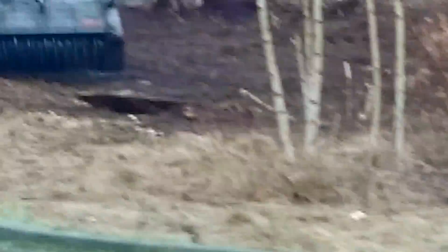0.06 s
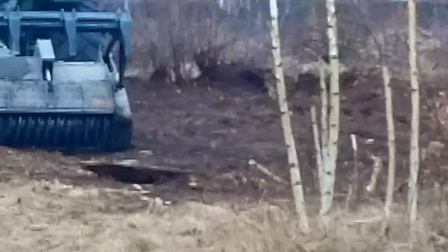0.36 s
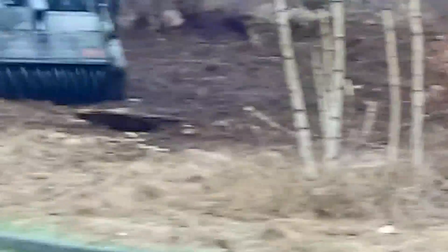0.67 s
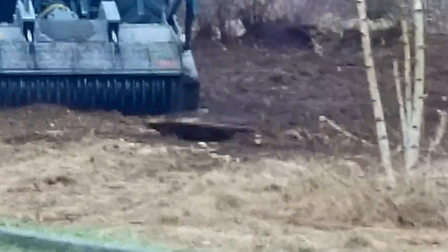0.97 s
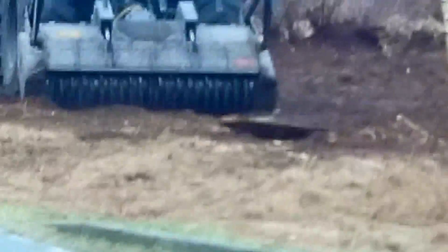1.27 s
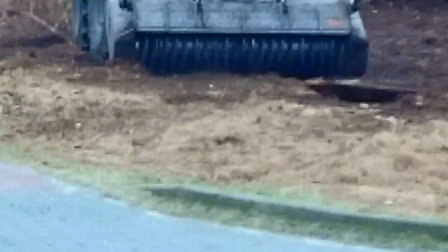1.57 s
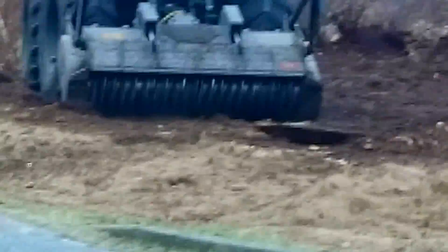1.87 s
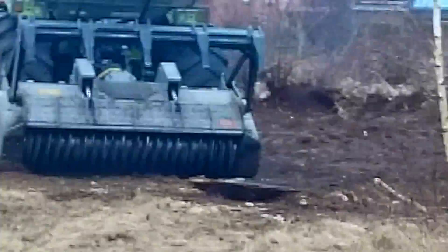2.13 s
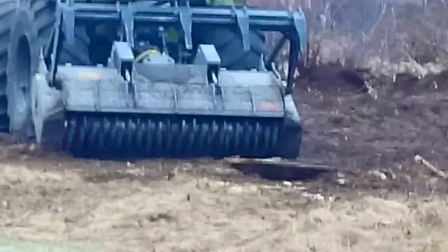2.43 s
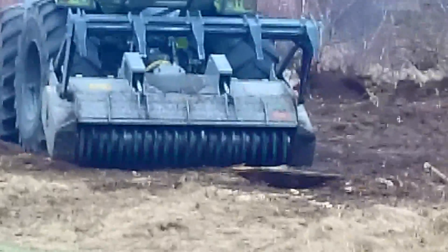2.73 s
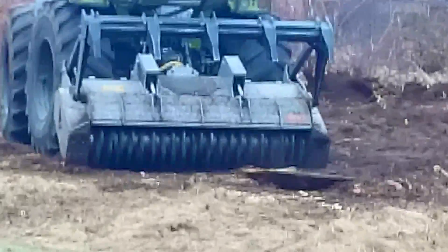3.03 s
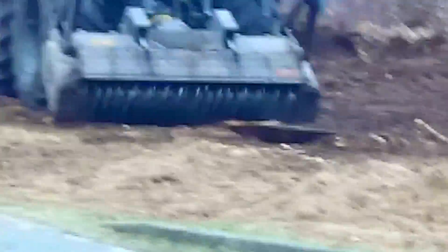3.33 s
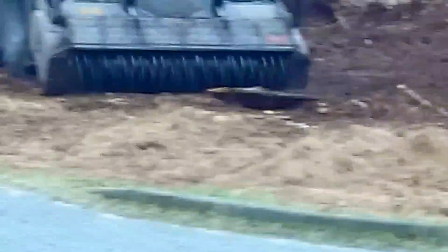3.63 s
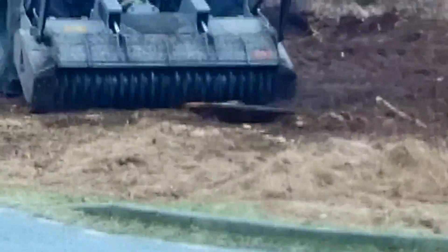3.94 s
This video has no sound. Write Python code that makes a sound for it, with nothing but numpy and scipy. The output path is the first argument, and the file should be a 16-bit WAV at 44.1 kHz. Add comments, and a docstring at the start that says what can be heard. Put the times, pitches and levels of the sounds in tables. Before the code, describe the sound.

Close by outdoors, a handheld phone picks up a throbbing diesel tractor driving a rattling mulcher. Brush crackles and crunches, eases off as the engine grows louder, then crackles again with sharp twig snaps and a faint whine.

```python
"""The throbbing drone of a six-cylinder diesel tractor, working in dry brush with a mulcher on its front.
The exhaust beats against the slightly slower hum of the rotor, over gas rumble, clatter and a thin whine.
Breaking brush crackles in two long surges, single twigs snap, and a green stem squeaks once.
Heard from nearby on a handheld phone, through two closely spaced microphone ports."""
import sys
import numpy as np
from scipy import signal
from scipy.fft import rfft, irfft
from scipy.io import wavfile
from scipy.ndimage import map_coordinates

SR = 44100
rng = np.random.default_rng(int(sys.argv[2]) if len(sys.argv) > 2 else 0)


def unload_wav(signal):
    """Save mono or channel-first audio to the path in sys.argv[1] as 16-bit WAV at rate SR, clipped to [-1, 1]."""
    wavfile.write(
        sys.argv[1],
        SR,
        np.round(np.clip(np.atleast_2d(signal).T, -1, 1) * 32767).astype(np.int16),
    )


N = 176400

# the phone's two ports (frequency [Hz], left minus right [dB], left phase lead [rad])
MIC_PORTS = [(60, -7.1, 0.82), (93, -5.7, 0.68), (186, -3.5, 0.36), (400, -3.7, 0.3), (600, -5.6, 0.28),
             (950, 0.2, 0.21), (1200, -6.0, -0.72), (1350, 0.0, 1.53), (1700, 5.2, 0.74), (2400, 6.5, 0.04),
             (2900, 4.9, -0.06), (3400, 0.7, -0.6), (4200, 0.8, -1.17), (4700, -0.2, -2.87),
             (5400, -6.5, -4.81), (6200, 0.3, -4.62), (7000, 3.5, -5.78), (7900, 4.0, -6.0),
             (8600, 0.2, -6.11), (9500, 5.5, -5.79), (11000, 0.2, -6.34), (12500, 0.9, -6.3),
             (14500, -3.3, -6.3)]

# thin whine from the machine (time [s], level [dB])
WHINE_LEVEL = [(0, -65), (1.1, -42), (1.6, -39.5), (2.1, -44.5), (2.5, -44), (2.68, -40.5), (2.97, -43.5),
               (3.1, -56), (3.21, -38), (3.4, -40), (3.72, -41), (3.89, -52), (4, -38.5)]

# tone of breaking brush (frequency [Hz], relative level [dB])
CRACKLE_SPECTRUM = [(2000, -11), (3100, -11), (4000, -7), (4800, -5.5), (5500, -4), (6400, -6),
                    (7400, -7.5), (8500, -16), (9700, -14), (11200, -22), (12500, -18), (15500, -20)]
# fine crackle and its direction (time [s], level [dB], lead at the left port [microseconds])
CRACKLE_PATH = [(0, -45, 48), (.28, -36.5, 36), (.63, -29, 48), (.8, -30, 35), (1.0, -28, 27),
                (1.2, -30.5, 15), (1.65, -30, -22), (1.87, -38, 13), (2.1, -40.5, 16), (2.45, -44.5, 28),
                (2.72, -49, 12), (2.78, -34.5, -25), (2.95, -42, -5), (3.08, -38.5, -29), (3.33, -38.5, 21),
                (3.68, -33, 24), (3.85, -38, 1.5), (4, -32, 22)]
# thicker stems crunching (time [s], level [dB])
CRUNCH_LEVEL = [(0, -38.5), (.3, -41.5), (.5, -31.5), (.65, -32.5), (.76, -36), (.88, -34), (.915, -28),
                (.955, -40), (.985, -27), (1.03, -36), (1.12, -36), (1.6, -47), (1.9, -58), (3.3, -57),
                (3.65, -37), (4, -50)]
# thin stems splintering (time [s], level [dB])
SPLINTER_LEVEL = [(0, -43.5), (1.1, -36), (1.35, -34.5), (1.6, -32.5), (1.8, -39), (2.1, -62), (2.7, -47),
                  (2.85, -43), (3.1, -38), (3.4, -38.5), (4, -35.5)]
CRUNCH_HZ, SPLINTER_HZ = 4300, 5530
# single twigs (time [s], ring pitch [Hz], crack level [dB], ring level [dB], crunch level [dB])
TWIG_SNAPS = [(0.148, 4540, -36, -27, -25), (0.195, 4400, -43, -33, -27), (0.64, 4900, -45, -24, -34),
              (0.657, 4760, -31, -28, -34), (0.719, 7050, -35, -30, -41), (.978, 4400, -35.5, -26, -20),
              (0.986, 4020, -31, -24, -24), (1.482, 5670, -29, -23, -36), (1.528, 5700, -33, -28, -38),
              (2.128, 5500, -42, -32, -31), (2.173, 5640, -38, -32, -36), (2.417, 5600, -37, -28, -29),
              (2.739, 5200, -24, -26, -36), (2.835, 6670, -33, -31, -42), (2.863, 6950, -36, -36, -40),
              (3.027, 5710, -40, -22.5, -35), (3.036, 5940, -41, -34, -28), (3.062, 5840, -46, -36, -44),
              (3.072, 5750, -42, -24.5, -42), (3.081, 5370, -44, -28, -42), (3.102, 5300, -35, -36, -44),
              (3.116, 5840, -44, -29, -44), (3.126, 5360, -46, -29, -44), (3.136, 6250, -31, -29, -31),
              (3.32, 5960, -45, -27, -38), (3.441, 6000, -34, -24.5, -26), (3.499, 5600, -29, -42, -28),
              (3.583, 5640, -44, -26, -38)]

# clatter of engine, drive and rotor (frequency [Hz], relative level [dB])
CLATTER_SPECTRUM = [(330, -9.5), (400, -5.5), (480, -3.5), (560, -4.5), (680, -1.5), (830, -9), (1000, -5),
                    (1240, -13), (1450, -8.5), (1750, -4.5), (2000, -6), (2400, -3.5), (2580, -11),
                    (2780, -5.5), (3120, -15), (3600, -9), (3980, -15.5), (4400, -9.5), (4900, -13),
                    (5450, -17.5), (6300, -24), (8000, -34), (11000, -51), (15500, -43)]
# resonances of the steel hood (frequency [Hz], width [Hz], level at 0 dB load [dB])
HOOD_MODES = [(5340, 94, -49), (2370, 19, -57), (1980, 42, -49), (1446, 50, -48), (980, 116, -48.5),
              (703, 47, -52.5), (479.6, 13, -47)]

# tones of the mulcher's rotor (multiple of its turning rate)
ROTOR_ORDERS = [2, 4, 6, 22]
# strength of each rotor tone (level [dB])
ROTOR_LEVELS = [-47.5, -31.5, -39, -58]
THROB_HZ, IN_STEP_S = 5.48, .13  # beat of rotor and firings, and a moment when they are in step

# engine speed (time [s], firing rate [Hz])
FIRING_RATE = [(0.0, 92.44), (0.41, 93.16), (1.0, 93.07), (1.1, 91.48), (1.7, 92.1), (1.75, 92.97),
               (2.72, 93.48), (3.73, 93.55), (4.0, 93.7)]
# engine load, as a gain on the drone (time [s], level [dB])
ENGINE_LOAD = [(0, -4.5), (.8, -5), (1.4, -5.5), (1.75, -2), (2.1, -0.5), (3, 1.5), (4, -1)]
# drone an octave above the firings (time [s], level [dB])
OCTAVE_LEVEL = [(0, -30), (.3, -23), (.55, -26), (.8, -26.5), (1.45, -27.5), (1.7, -22), (1.9, -26.5),
                (2.4, -25.5), (2.7, -23.5), (3.5, -24), (4, -21)]
# weaker tones from unequal cylinders (multiple of the four-stroke cycle rate)
CYCLE_ORDERS = [4, 5, 7, 8, 9, 13, 14, 16, 18, 20, 22, 26, 30, 32]
# strength of each of those tones (level at 0 dB load [dB])
CYCLE_LEVELS = [-40, -40, -35.5, -56, -37, -40, -44, -41.5, -42.5, -41.5, -50, -54.5, -47, -52.5]
# gas rumble from the exhaust (frequency [Hz], relative level [dB])
RUMBLE_SPECTRUM = [(20, -17), (29, -23), (42, -23), (62, 2), (110, -1.5), (160, 2), (188, 0.5), (230, 2.5),
                   (275, -6), (330, -19.5), (450, -19), (900, -54.5)]
CYLINDERS = 6


def undb(db):
    """Decibels to gain."""
    return 10 ** (np.asarray(db) / 20)


def unit(x):
    """Scale to rms 1."""
    return x / np.sqrt(np.mean(x ** 2))


def times():
    """Time of every sample in seconds."""
    return np.arange(N) / SR


def bins():
    """Frequency of every spectral bin, at least 1 Hz."""
    return np.maximum(np.fft.rfftfreq(N, 1 / SR), 1)


def curve(table, column=1):
    """One column of a table, joined over time."""
    rows = np.array(table, float)
    return np.interp(times(), rows[:, 0], rows[:, column])


def response(table, column=1):
    """One column of a table, joined over log frequency."""
    rows = np.array(table, float)
    return np.interp(np.log(bins()), np.log(rows[:, 0]), rows[:, column])


def colour(x, db):
    """Causal filter with the given gain in each bin."""
    cepstrum = irfft(np.log(undb(db)), N)
    cepstrum[1:N // 2] *= 2
    cepstrum[N // 2 + 1:] = 0
    return irfft(rfft(x) * np.exp(rfft(cepstrum)), N)


def resonance(hz, width_hz):
    """Complex gain of a single resonance in each bin."""
    return 1 / (1 + 1j * hz / width_hz * (bins() / hz - hz / bins()))


def band(x, hz, width_hz):
    """Two resonances in series give a steep-sided band, scaled to rms 1."""
    return unit(irfft(rfft(x) * resonance(hz, width_hz) * resonance(hz, 2 * width_hz), N))


def wander(rate_hz):
    """Smooth random drift with rms 1."""
    return unit(irfft(rfft(rng.standard_normal(N)) / (1 + (bins() / rate_hz) ** 4), N))


def clicks(per_s, spread_db):
    """Random clicks, mostly small: one stream from ahead and one from each side."""
    size = undb(spread_db * np.minimum(rng.exponential(size=(3, N)), 2 * np.pi))
    return (rng.random((3, N)) < per_s / SR) * rng.choice([-1, 1], (3, N)) * size


def microphone(x, diffuse=0, lead_us=0):
    """Sound from ahead reaches both ports with a phase difference; side streams reach one port each."""
    streams = np.atleast_2d(x)
    ahead = streams[0]
    sides = np.array([[1], [-1]])
    if np.any(lead_us):
        shift = lead_us * 1e-6 * SR / 2
        ahead = np.array([map_coordinates(ahead, [np.arange(N) + side * shift], mode="mirror")
                          for side in (1, -1)])
    heard = rfft(ahead) * np.exp(.5j * sides * response(MIC_PORTS, column=2))
    if diffuse:
        side_share = diffuse / (1 + (600 / bins()) ** 2)
        heard = np.sqrt(1 - side_share) * heard + np.sqrt(side_share) * rfft(streams[1:])
    balance = undb(sides * response(MIC_PORTS) / 2)
    return irfft(heard * balance / np.sqrt(np.mean(balance ** 2, axis=0)), N)


def stem_squeak(at_s=1.625, half_length_s=.014):
    """A green stem bends with a faint stick-slip squeal."""
    swell = np.exp(-((times() - at_s) / half_length_s) ** 2)
    return microphone(undb(-37) * swell * band(rng.standard_normal(N), hz=2680, width_hz=300))


def machine_whine():
    """A narrow, rough whine that surges as the machine comes closer."""
    whine = band(rng.standard_normal((3, N)), hz=3980, width_hz=150)
    return microphone(undb(curve(WHINE_LEVEL)) * whine, diffuse=.03)


def twig_snaps(decay_s=.0045, ring_width_hz=1000):
    """Each twig breaks with a short broad crack, a ring at its own pitch and a crunch."""
    tilt_db = 4 * np.log2(np.maximum(bins(), 500) / SPLINTER_HZ)
    crack = unit(colour(rng.standard_normal((3, N)), response(CRACKLE_SPECTRUM) + tilt_db))
    crunch = band(rng.standard_normal((3, N)), CRUNCH_HZ, width_hz=1600)
    age = times()[:N // 40]
    envelope = 1.282 * np.exp(-age / decay_s)
    out = np.zeros((3, N))
    for start, hz, crack_db, ring_db, crunch_db in TWIG_SNAPS:
        span = slice(int(start * SR), int(start * SR) + len(age))
        twig = signal.iirpeak(hz, hz / ring_width_hz, fs=SR)
        burst = rng.standard_normal((3, len(age))) * envelope
        ringing = signal.lfilter(*twig, signal.lfilter(*twig, burst))
        out[:, span] += undb(ring_db) * unit(ringing) * np.sqrt(np.mean(envelope ** 2))
        out[:, span] += envelope * (undb(crack_db) * crack[:, span] + undb(crunch_db) * crunch[:, span])
    return microphone(out, diffuse=.61)


def breaking_brush():
    """Dry stems break in a dense crackle, sparser when quiet; the wood rings in two broad bands."""
    level_db = curve(CRACKLE_PATH)
    density = undb(.66 * (level_db - level_db.max()))
    shape_db = response(CRACKLE_SPECTRUM) - 10 * np.log10(1 + (1500 / bins()) ** 4)
    crossover = (bins() / 10500) ** 8
    crackle = 0
    for cut in (crossover, 1 / crossover):  # separate clicks below and above the crossover
        breaks = clicks(per_s=5000 * density, spread_db=3.5) / np.sqrt(density)
        crackle += colour(breaks, shape_db - 10 * np.log10(1 + np.minimum(cut, 100)))
    crunch = band(clicks(per_s=3000, spread_db=3), CRUNCH_HZ, width_hz=1250)
    splinter = band(clicks(per_s=2200, spread_db=1), SPLINTER_HZ, width_hz=870)
    brush = unit(crackle) * undb(level_db)
    brush += crunch * undb(curve(CRUNCH_LEVEL)) + splinter * undb(curve(SPLINTER_LEVEL))
    flicker = undb(wander(45))
    return microphone(brush * flicker, diffuse=.33, lead_us=curve(CRACKLE_PATH, column=2))


def panels(x, decay_s=.012, mix=.35):
    """Many short sheet-metal modes add to the sound passing through."""
    tail = rng.standard_normal(N) * np.exp(-np.minimum(times() / decay_s, 50))
    return irfft(rfft(x) * (1 + mix * rfft(tail) / np.sqrt(np.sum(tail ** 2))), N)


def clatter(rotor_angle):
    """Dense knocks, pulsing once per rotor turn, sound through the frame; light taps ring the hood."""
    pulsing = 1 + .078 * np.cos(rotor_angle)
    knocks = clicks(per_s=9000, spread_db=2.5) * pulsing * undb(1.3 * wander(42))
    low_cut_db = -10 * np.log10(1 + (220 / bins()) ** 6)
    frame = undb(-33) * unit(colour(panels(knocks), response(CLATTER_SPECTRUM) + low_cut_db))
    taps = clicks(per_s=8700, spread_db=1.5)
    modes = sum(undb(db) / np.sqrt(np.pi * width / SR) * resonance(hz, width)
                for hz, width, db in HOOD_MODES)
    hood = irfft(rfft(taps) * modes, N) / np.std(taps)
    return microphone(frame + hood * undb(.5 * curve(ENGINE_LOAD)), diffuse=.39)


def rotor_hum(rotor_angle):
    """The rotor's strongest tone lies just under the firing rate, so that the two beat."""
    return microphone(sum(np.sqrt(2) * undb(db + .5 * wander(1.5)) * np.cos(order * rotor_angle)
                          for order, db in zip(ROTOR_ORDERS, ROTOR_LEVELS)))


def unequal_cylinders(cycle_angle):
    """Cylinders fire unequally, adding wavering tones at multiples of the four-stroke cycle."""
    tones = np.zeros(N)
    for order, db in zip(CYCLE_ORDERS, CYCLE_LEVELS):
        amplitude = np.sqrt(2) * undb(db + 1.6 * wander(3))
        phase = order * (cycle_angle + .03 * wander(6.5)) + 2 * np.pi * rng.random()
        tones += amplitude * np.cos(phase)
    return tones


def exhaust(firing_phase):
    """Firing pulses drone with their octave, over weaker tones and pulsing gas rumble."""
    load_db = curve(ENGINE_LOAD)
    drone = undb(-22 + load_db + .6 * wander(3)) * np.cos(firing_phase)
    octave = undb(curve(OCTAVE_LEVEL) + .6 * wander(3)) * np.cos(2 * firing_phase)
    uneven = undb(.45 * load_db) * unequal_cylinders(firing_phase / CYLINDERS)
    gas = rng.standard_normal(N) * (1 + .39 * np.cos(firing_phase))
    rumble = undb(-28 + .14 * load_db) * unit(colour(gas, response(RUMBLE_SPECTRUM)))
    return microphone(np.sqrt(2) * (drone + octave) + uneven + rumble)


def scene():
    """The engine drives the rotor at just under a quarter of the firing rate; brush breaks on its own."""
    firing_phase = 2 * np.pi * np.cumsum(curve(FIRING_RATE)) / SR
    rotor_angle = (firing_phase - 2 * np.pi * THROB_HZ * (times() - IN_STEP_S)) / 4
    tractor = exhaust(firing_phase) + rotor_hum(rotor_angle) + clatter(rotor_angle) + machine_whine()
    return tractor + breaking_brush() + twig_snaps() + stem_squeak()


def record(dry):
    """The phone cuts the treble steeply above 15.9 kHz."""
    return signal.sosfilt(signal.ellip(10, .2, 80, 15900, fs=SR, output="sos"), dry)


dry = scene()
out = record(dry)
unload_wav(out)
```